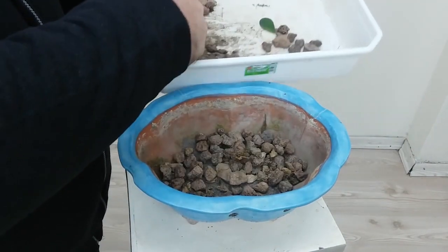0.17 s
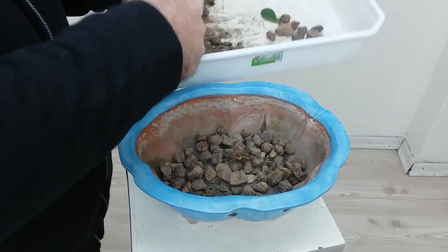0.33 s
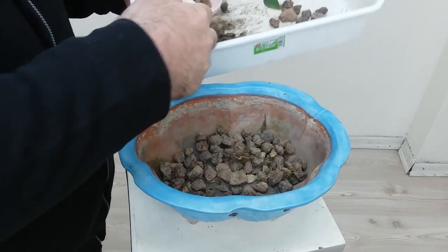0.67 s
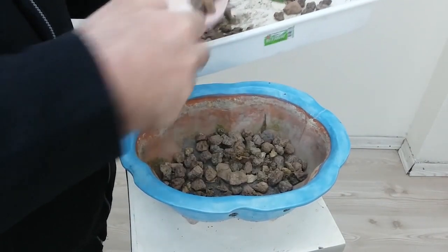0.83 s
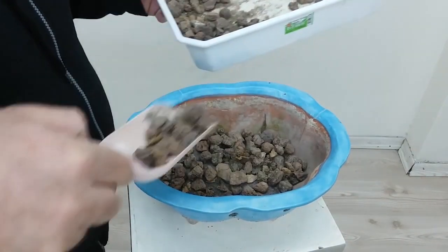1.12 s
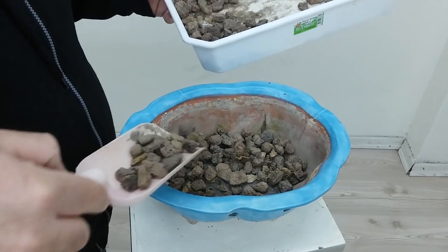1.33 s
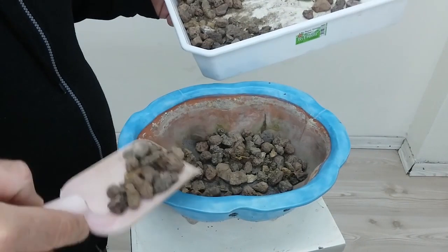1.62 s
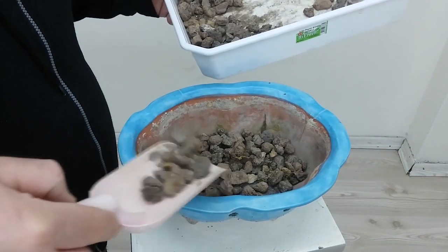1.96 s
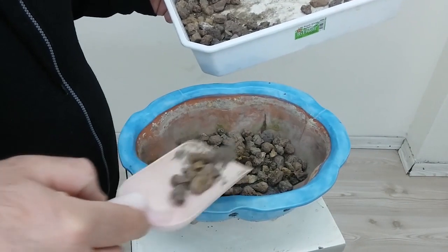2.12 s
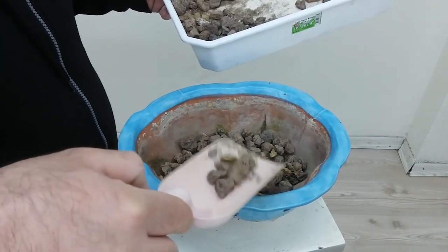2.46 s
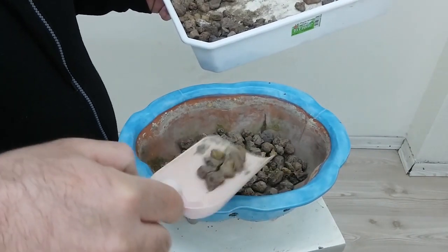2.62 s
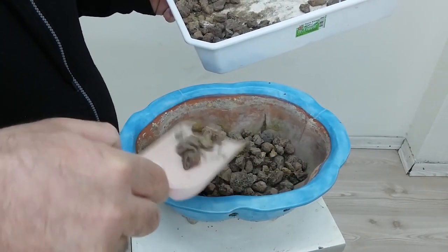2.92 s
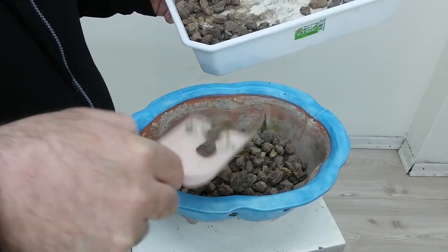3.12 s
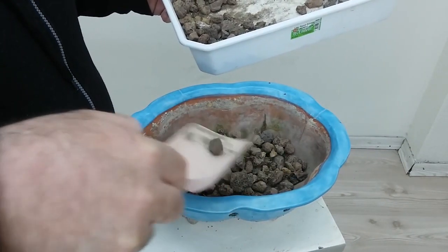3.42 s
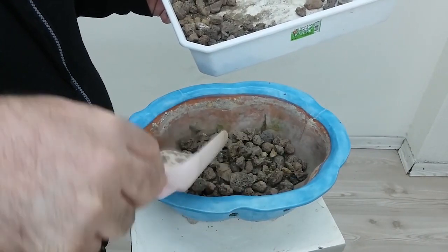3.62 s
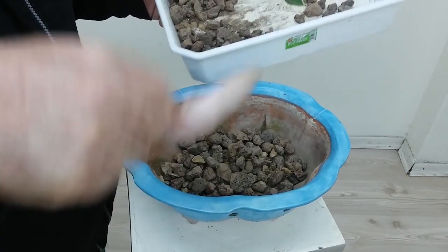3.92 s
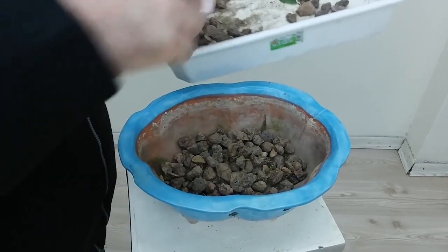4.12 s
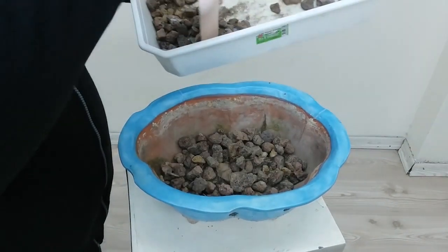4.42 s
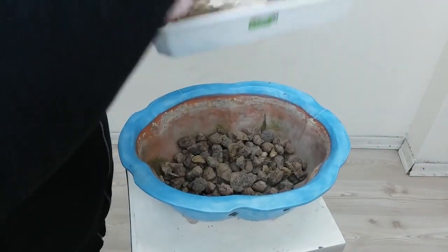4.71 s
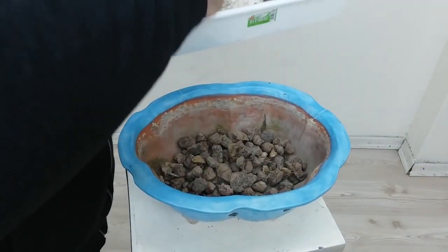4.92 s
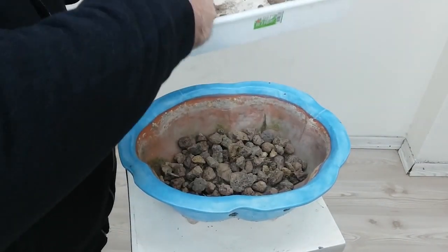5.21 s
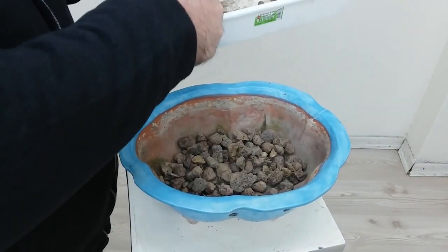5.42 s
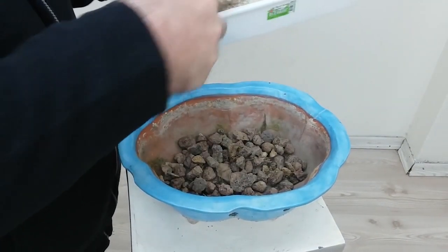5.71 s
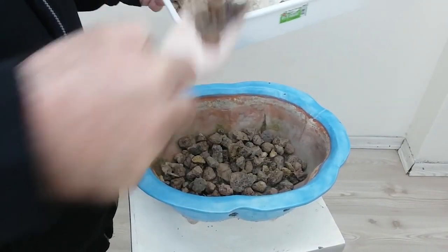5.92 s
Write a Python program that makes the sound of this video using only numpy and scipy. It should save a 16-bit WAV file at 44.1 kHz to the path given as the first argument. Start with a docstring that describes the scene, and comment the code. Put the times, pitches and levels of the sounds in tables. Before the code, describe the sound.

From the start a plastic scoop pushes through lumps of porous rock in a plastic tray, making a dense, gritty rattle with hollow knocks and a low boom, strongest just before 1 second. From about 1.3 seconds the lumps are shaken into a clay pot. They land unevenly on a bed of stones with dry clacks, a few clink against the clay wall, and fine grit trickles among them until about 3.8 seconds. A few faint taps on the tray follow at around 4 seconds. At 4.5 seconds the scoop digs in again with a sharp knock and a loud, crunchy rattle, which thins after 5.1 seconds into scattered knocks and light scraping up to about 6 seconds. Everything is heard from close by in a bare room, with slight reverberation and a faint hiss underneath.

```python
"""Scooping porous rock into a clay pot

A plastic scoop digs lumps out of a plastic tray and shakes them into a clay pot, in a bare room.
Each impact excites damped modes and a short crack of noise. Digging is a dense rattle of such
impacts in the booming tray, with knocks among them; in the pot each lump rings the bed of stones
or the clay wall. A close pair of microphones takes the sound, and its peaks are rounded."""
import sys
import numpy as np
from scipy import signal
from scipy.fft import rfft, irfft, next_fast_len
from scipy.io import wavfile

SR = 44100
rng = np.random.default_rng(int(sys.argv[2]) if len(sys.argv) > 2 else 0)


def pcm_store(signal):
    """Save signal as 16-bit PCM."""
    levels = np.round(np.clip(np.atleast_2d(signal), -1, 1) * 32767)
    wavfile.write(sys.argv[1], SR, levels.astype(np.int16).T)


N = 267731

# Levels are relative within each table; t60 is the time a vibration takes to fall by 60 dB.
# reverberation time: f/Hz, t60/s
REVERB_TIME = [(100, 1), (300, 0.73), (1000, 0.57), (3000, 0.58), (7000, 0.41), (14000, 1)]
# spectrum of the reflections: f/Hz, level/dB
REVERB_SPECTRUM = [(100, -23.5), (300, -7), (1000, -2), (3000, -3.5), (7000, -0.5), (14000, -31.5)]
# left-right coherence of the reflections: f/Hz, correlation
COHERENCE = [(100, 0.84), (300, 0.97), (600, 0.81), (1200, 0.13), (3000, 0.029), (6000, 0.049), (12000, 1)]
# left microphone relative to right: f/Hz, level/dB
MIC_BALANCE = [(60, 1.5), (180, 1.5), (550, -0.5), (1650, -2.5), (4970, 0.5), (15000, 2.5)]
# phase lead of the left microphone: f/Hz, phase/rad
MIC_PHASE = [(150, 0.), (700, 0.3), (3200, 0.97), (4000, 1.62), (5800, 0.5), (16000, 1.14)]

# modes of the tray's panels: f/Hz, level/dB, t60/s
TRAY_MODES = [(215, 2, 0.036), (297, -2.5, 0.034), (341.4, -1.5, 0.031), (409, -3, 0.098), (484, -4, 0.095),
              (564, -4.5, 0.07), (691, 8.5, 0.0091), (743, -0.5, 0.013), (952, 2, 0.0066),
              (1002, -7.5, 0.06), (1180, 7.5, 0.017), (1395, 5.5, 0.0081), (1770, 13.5, 0.0062),
              (1940, 0, 0.014), (2130, 13.5, 0.0027), (3160, 3, 0.01)]
# low modes of the tray's floor: f/Hz, level/dB, t60/s
BOOM_MODES = [(102.7, -14.5, 0.66), (159.4, -11, 0.4), (197.3, -11, 0.57), (221, -12, 0.18)]
# modes of the hollow scoop: f/Hz, level/dB, t60/s
SCOOP_MODES = [(791, -4.5, 0.13), (1120, -4, 0.048), (1354, 2, 0.054), (1680, 7, 0.018)]
# modes of the table under the pot: f/Hz, level/dB, t60/s
TABLE_MODES = [(61, -55.5, 0.079), (110, -52, 0.023), (263, -48, 0.012)]
# modes of the air in the pot: f/Hz, level/dB, t60/s
CAVITY_MODES = [(305, -34.5, 0.16), (438, -19.5, 0.11), (511.8, -18, 0.17), (686, -28.5, 0.06)]
# modes of the loose bed of stones: f/Hz, level/dB, t60/s
BED_MODES = [(777, -19, 0.085), (970, 12.5, 0.017), (1490, 12.5, 0.025), (1497, 4, 0.027),
             (1804, 10, 0.022), (2130, 19, 0.0051), (2400, 9, 0.012), (3490, 25, 0.002)]
# modes of the clay wall: f/Hz, level/dB, t60/s
WALL_MODES = [(1528, 7.5, 0.052), (2068, 0, 0.047), (2314, 0, 0.022), (3100, 0, 0.044), (3213, 4, 0.041),
              (3533, 2.5, 0.025), (3920, 3.5, 0.024), (4280, 5, 0.024), (4380, 7.5, 0.015),
              (4630, 10.5, 0.0083), (4900, 2, 0.0087), (5880, 6.5, 0.0043), (6900, 1.5, 0.019),
              (7300, -11, 0.025), (7900, -15, 0.03)]

# grit striking grit: t/s, level/dB, dust tail re level/dB
GRIT_TICKS = [(0.5444, -38, -26), (0.595, -33, -32), (0.6702, -29.5, -38), (0.8885, -23.5, -35),
              (0.9004, -39, -31), (1.512, -34, -22), (1.551, -22.5, -22), (1.6031, -28, -31),
              (1.6294, -26, -26), (1.893, -15.5, -30), (2.0556, -48, -28), (2.1705, -21, -28),
              (2.2817, -25, -29), (2.389, -46, -26), (2.4164, -37, -26), (2.4618, -48, -29),
              (2.563, -43, -26), (2.568, -38, -15), (2.7586, -53, -26), (2.8833, -44, -28),
              (2.9238, -47, -28), (3.0605, -37, -28), (3.128, -38, -21), (3.1822, -34, -26),
              (3.2016, -32, -28), (3.2835, -28.5, -21), (3.3774, -27, -32), (3.3847, -16, -35),
              (3.4466, -26, -35), (3.4999, -37, -29), (3.548, -21, -36.5), (3.8046, -29.5, -29),
              (3.8118, -37, -33), (4.5151, -40, -26), (4.5231, -23, -30), (4.7381, -30, -17),
              (5.2024, -34.5, -24), (5.838, -26, -26)]
# pushes of the scoop through the lumps: t/s, hold/s, level/dB
SCOOP_PUSHES = [(-0.03, 0.026, -14), (0.123, 0.027, -20), (0.15, 0.033, -13.5), (0.359, 0.093, -19.5),
                (0.497, 0.019, -15), (0.66, 0.048, -24.5), (0.79, 0.13, -33), (0.893, 0.068, -27.5),
                (4.326, 0.11, -38.5), (4.509, 0.013, -12), (4.694, 0.043, -11), (4.715, 0.186, -15),
                (4.937, 0.15, -16), (5.028, 0.053, -14), (5.21, 0.14, -28), (5.326, 0.077, -28),
                (5.434, 0.055, -24), (5.53, 0.033, -37)]
# how freely the tray's floor booms under rattle and knocks: t/s, level/dB
BOOM_RESPONSE = [(0, -3.5), (0.3, -5.5), (0.4, -47), (0.75, -10.5), (0.88, 1.5), (0.93, -5), (1.1, -10),
                 (1.3, -25.5), (4.0, -28.5), (4.55, -17.5), (4.85, -11), (5.1, -28), (5.6, -57), (5.9, -60)]
# the scoop's bowl grazing lumps and tray: t/s, level/dB, f/Hz
SCOOP_GRAZES = [(.053, -14.5, 1700), (0.18, -16, 1700), (.21, -24.5, 1660), (4.073, -35, 1307),
                (4.334, -28, 814), (4.356, -34.5, 805), (4.501, -15, 1150), (4.528, -4, 1100),
                (5.085, -14, 1700), (5.107, -20, 1720)]
# scoop and lumps knocking on the tray: t/s, level/dB, f/Hz, crack re level/dB
TRAY_KNOCKS = [(0.009, -3.5, 418, -19), (0.052, -9, 1010, -34), (0.195, -8, 607, -17),
               (0.215, -16, 585, -24), (0.39, -14, 1710, -38), (0.479, -5, 1230, -17),
               (0.512, -6.5, 1930, -12.5), (0.535, -29, 1590, -21), (0.544, 4, 836, -25),
               (0.569, -2.5, 623, -39), (0.595, -4.5, 595, -10.5), (0.672, 6, 920, -19.5),
               (0.691, -3.5, 1190, -41), (0.737, -5.5, 587, -41), (0.872, -5.5, 404, -44),
               (0.889, 10, 283, -19.5), (0.897, -5, 740, -16.5), (0.905, -2.5, 770, -31),
               (0.923, 2.5, 358, -45), (0.95, 3.5, 220, -45), (0.988, -1, 277, -45), (1.163, -7, 620, -29),
               (1.242, -10.5, 518, -32), (1.255, -29, 677, -19), (4.065, -21, 339, -18),
               (4.071, -21.5, 390, -41), (4.101, -28.5, 440, -33), (4.309, -30.5, 1700, -34),
               (4.334, -30.5, 820, -6), (4.36, -23, 810, -35), (4.416, -24, 780, -17),
               (4.451, -24, 493, -17), (4.502, -26, 1140, -4.5), (4.516, -26, 990, 3),
               (4.526, 3.5, 960, -9), (4.54, -1.5, 368, -30), (4.55, -0.5, 604, -28),
               (4.557, -29, 750, -31), (4.704, -23, 1570, -33), (4.736, -2, 1150, -10),
               (4.741, -1, 1550, -8), (4.758, 1, 480, -11), (4.798, 3.5, 590, -15), (4.835, 1, 556, -28),
               (4.869, 2, 590, -26), (4.9, -16, 1950, -28.5), (4.91, 0, 436, -16.5), (5.089, -7, 420, -10),
               (5.207, -19, 1520, -0.5), (5.246, -7.5, 1190, -18.5), (5.378, -13, 720, -30),
               (5.436, -11, 1520, -16), (5.444, -1, 630, -29), (5.451, -5, 685, -37), (5.464, -8, 700, -39),
               (5.489, -5.5, 1030, -14), (5.58, -4.5, 940, -18.5), (5.625, -9, 960, -16.5),
               (5.836, -6.5, 420, -40), (5.843, -0.5, 540, -19.5), (5.9, -11.5, 530, -21),
               (6.031, -10.5, 430, -30)]
# small stones sliding off the scoop and settling: t/s, level/dB
TRICKLE_LEVEL = [(1.2, -91), (1.3, -34), (1.57, -19), (2.07, -32), (2.3, -40), (2.86, -34), (3.22, -27.5),
                 (3.3, -32), (3.44, -22.5), (3.75, -110)]
# lumps landing on the bed: t/s, level/dB, f/Hz, crack re level/dB
BED_IMPACTS = [(1.324, -27, 2000, -27), (1.355, -16.5, 1608, -18), (1.399, -17.5, 1790, -10),
               (1.468, -20, 1744, -31), (1.485, -20, 1540, -16), (1.517, -16, 1870, -17),
               (1.68, -16, 1980, -39), (1.74, -21.5, 1510, -45.5), (1.787, -18.5, 1940, -15),
               (1.799, -16, 1850, -17), (1.885, -26, 1610, -12), (1.916, -12, 1710, -37),
               (1.931, -9, 1730, -34), (1.947, -11, 960, -14), (1.955, -19, 1940, -11),
               (1.985, -24, 1820, -30), (2.056, -14, 1570, -8), (2.068, -23.5, 1510, -13),
               (2.084, -18, 1390, -13), (2.1, -13, 697, -32), (2.171, -22, 1610, 2.5),
               (2.186, -18, 1340, -20), (2.218, -17.5, 1430, -21), (2.237, -18.5, 1590, -26),
               (2.282, -25.5, 1470, -0.5), (2.303, -23, 1610, -11), (2.358, -22.5, 1080, -24),
               (2.391, -15.5, 1900, -12.5), (2.419, -12, 2100, -11.5), (2.464, -17.5, 1390, -13),
               (2.473, -20, 1800, -5), (2.563, -22, 1980, -25), (2.605, -16, 1770, -23),
               (2.744, -23, 2330, -27.5), (2.759, -26, 920, -10), (2.825, -28, 1770, -35),
               (2.831, -16, 1790, -16), (2.869, -20.5, 1470, -17), (2.884, -25, 1960, -6),
               (2.904, -21.5, 2130, -17), (2.924, -18, 1530, -12.5), (2.974, -27, 2500, -15.5),
               (3.014, -28, 1520, -19), (3.016, -18, 2010, -30), (3.041, -10, 1490, -19),
               (3.059, -10.5, 1440, -8.5), (3.111, -22, 1620, -22), (3.176, -20.5, 1530, -31),
               (3.181, -8.5, 1960, -20), (3.195, -8, 1460, -11), (3.202, -21.5, 1790, -5.5),
               (3.248, -31, 1820, -10), (3.319, -12, 940, -22), (3.349, -17, 1460, -13.5),
               (3.5, -12, 1800, -17), (3.512, -27, 970, -2), (3.52, -22.5, 1190, -14),
               (3.552, -49, 1210, 11), (3.605, -16.5, 840, -22), (3.612, -19, 967, -14.5),
               (3.639, -17.5, 1660, -22), (3.805, -39.5, 2305, 17.5), (3.813, -46, 2320, 7)]
# lumps striking the wall: t/s, level/dB, f/Hz, crack re level/dB, fall away from f/(dB per octave),
# contact/s, lingering f/Hz, lingering ring re level/dB
WALL_IMPACTS = [(1.528, -11.5, 4440, -26, 12, 0.0043, 2083, -11),
                (1.553, -14, 3880, -9, 16, .006, 3950, -12), (1.604, -5, 3450, -15.5, 9, .005, 2083, -6.5),
                (1.894, -6.5, 3830, -5, 22, .006, 3548, -6.5),
                (2.425, -15, 3160, -25, 14, 0.0016, 2270, -5.5), (2.569, -8, 4320, -6, 3, .007, 4280, -10),
                (3.127, -11, 1700, -9, 11.5, 0.0051, 1500, -17),
                (3.286, -4, 3220, -3.5, 15, 0.0077, 3548, -5.5),
                (3.386, -11.5, 2260, -12, 9, .003, 2270, -2.5),
                (3.447, -13.5, 3150, -26, 21, 0.0053, 3540, -22)]

GRIT_SLOPE = 1.126   # dB of grit and sand per dB of rattle
TRAY_CUTOFF_HZ, BED_CUTOFF_HZ = 5560, 6000   # blunt contacts excite little above these


def amp(db):
    """Amplitude ratio of a level in decibels."""
    return 10 ** (np.asarray(db) / 20)


def at_hz(points, hz):
    """Interpolation on a logarithmic frequency axis."""
    return np.interp(np.log(hz), np.log(np.array(points)[:, 0]), np.array(points)[:, 1])


def in_time(rows):
    """Linear interpolation at every sample."""
    return np.interp(np.arange(N) / SR, *np.transpose(rows))


def band(x, low_hz, high_hz):
    """Band-pass filter, 12 dB per octave on each side."""
    return signal.sosfilt(signal.butter(2, [low_hz, high_hz], "band", fs=SR, output="sos"), x)


def high_pass(x, hz):
    """Fourth-order high-pass filter."""
    return signal.sosfilt(signal.butter(4, hz, "high", fs=SR, output="sos"), x)


def low_pass(x, hz):
    """Fourth-order low-pass filter."""
    return signal.sosfilt(signal.butter(4, hz, "low", fs=SR, output="sos"), x)


def unit_power(x):
    """Normalisation to a mean square of one."""
    return x / np.sqrt(np.mean(x ** 2) + 1e-20)


def impulses(s, sizes):
    """Brief contacts idealised as impulses at times s."""
    clicks = np.zeros(N)
    np.add.at(clicks, np.round(s * SR).astype(int), sizes)
    return clicks


def grains(per_s, uneven_db):
    """Shot noise: independent contacts of random size and sign."""
    sizes = amp(uneven_db * np.minimum(rng.exponential(1, N), 4)) * rng.choice([-1, 1], N)
    return sizes * (rng.random(N) < per_s / SR)


def ring(clicks, hz, t60):
    """Damped oscillator: each impulse starts an exponentially decaying sine."""
    r, w = amp(-60 / (max(t60, .003) * SR)), 2 * np.pi * hz / SR
    return signal.lfilter([0, np.sin(w)], [1, -2 * r * np.cos(w), r * r], clicks + 1e-18)


def rattle(modes, per_s, uneven_db):
    """Random excitation: each contact drives every mode with a random weight; unit power."""
    contacts = grains(per_s, uneven_db)
    rings = (amp(db) * ring(contacts * rng.normal(0, 1, N), hz, t60) for hz, db, t60 in modes)
    return unit_power(sum(rings))


def strike(s, gains, modes):
    """Modal superposition; gains has a row for each blow and a column for each mode."""
    return sum(ring(impulses(s, gain * amp(db)), hz, t60) for (hz, db, t60), gain in zip(modes, gains.T))


def thud(s, level_db, modes):
    """Impulse response of low modes, each varying by about 3 dB from blow to blow."""
    return strike(s, amp(level_db[:, None] + rng.normal(0, 3, (len(s), len(modes)))), modes)


def strike_near(s, level_db, hz, modes, fall_db=90):
    """The point of impact favours modes near hz; the default fall per octave singles out the nearest."""
    octaves = np.abs(np.log2(np.array(modes)[:, 0] / hz[:, None]))
    weights = amp(-fall_db * np.minimum(octaves, 1.6) + rng.normal(0, 2.5, octaves.shape))
    weights *= rng.choice([-1, 1], octaves.shape)
    weights /= np.sqrt(np.sum(weights ** 2, axis=1, keepdims=True))
    return strike(s, weights * amp(level_db)[:, None], modes)


def clacks(s, level_db, pitch_hz, cycles, spread_octaves):
    """Free vibration of irregular lumps: inharmonic modes, each falling 60 dB in the given cycles."""
    count, length, rise_s = 11, 3000, 0.000089
    out, t = np.zeros(N + length), np.arange(length) / SR
    chance = rng.uniform(-1, 1, (len(s), 2, count))
    steps = np.linspace(-1, 1, count)
    scatter = steps + chance[:, 0] / count * (steps != 0)
    hz = np.clip(pitch_hz[:, None] * 2 ** (spread_octaves * scatter), 200, 9000)[..., None]
    strength = (amp(-9 * np.sqrt(np.abs(scatter))) * np.sign(chance[:, 1]))[..., None]
    shapes = np.sum(strength * np.sin(2 * np.pi * hz * t) * amp(-60 * t * hz / cycles), axis=1)
    shapes *= 1 - np.exp(-t / rise_s)   # a rough contact takes time to build up
    for start, db, shape in zip(np.round(s * SR).astype(int), level_db, shapes):
        out[start:start + length] += amp(db) * shape / np.abs(shape).max()
    return out[:N]


def crack(s, level_db, low_hz, high_hz, decay_s, rise_s=0.0011):
    """Contact transient: a single snap, then a burst of noise that decays exponentially."""
    decay = signal.lfilter([1], [1, -np.exp(-1 / (decay_s * SR))], impulses(s, amp(level_db)) + 1e-18)
    pole = np.exp(-1 / (rise_s * SR))
    envelope = signal.lfilter([1 - pole], [1, -pole], decay)
    snap = impulses(s, amp(level_db + 3))
    return band(envelope * rng.standard_normal(N) + snap, low_hz, high_hz)


def hiss():
    """Noise floor: faint band-limited noise, uncorrelated between left and right."""
    return amp(-58) * high_pass(band(rng.standard_normal((2, N)), 970, 6400), 500)


def room(x):
    """Reverberation: convolution with half-octave bands of noise, each decaying at its own rate."""
    t, response = np.arange(int(.9 * SR)) / SR, 0
    edges = 70 * 2 ** np.arange(0, 8.1, .5)
    for low, high in zip(edges, edges[1:]):
        hz = np.sqrt(low * high)
        mid, side = band(rng.standard_normal((2, len(t))), low, high)
        coherence = at_hz(COHERENCE, hz)
        pair = np.sqrt(1 + coherence) * mid + np.sqrt(1 - coherence) * side * [[1], [-1]]
        response = response + pair * amp(at_hz(REVERB_SPECTRUM, hz) - 60 * t / at_hz(REVERB_TIME, hz))
    early_boost = 1 + amp(6 - 60 * t / 0.03)
    onset = np.clip((t - .002) / 0.0029, 0, 1)   # reflections thicken after the first wall
    return signal.fftconvolve(x[None], response * early_boost * onset, axes=1)[:, :N]


def sand():
    """Dense shot noise: tiny grains merge into a bright, rough hiss; unit power."""
    return unit_power(band(grains(per_s=3000, uneven_db=4.5), 5000, 13000))


def grit_ticks():
    """Short contacts have bright spectra: grit ticks on grit and throws a tail of dust."""
    s, level_db, tail_db = np.transpose(GRIT_TICKS)
    tick = crack(s, level_db + 7, 4000, 10000, decay_s=0.00076)
    dust = crack(s, level_db + tail_db + 12.5, 5300, 13000, decay_s=0.029)
    return tick + dust


def push_level(attack_s=0.018, release_db_per_s=117.5):
    """Envelope in dB: each push rises, holds and decays exponentially; the strongest prevails."""
    start, hold, db = np.transpose(SCOOP_PUSHES)[..., None]
    t = np.arange(N) / SR - start - attack_s
    rise_db = 20 * np.log10(np.clip(1 + t / attack_s, 1e-6, 1))
    return np.max(db + rise_db - release_db_per_s * np.maximum(t - hold, 0), axis=0)


def tray():
    """Forced vibration: pushes and knocks drive the tray's panels and floor; grazes ring the scoop."""
    push_db = push_level()
    body = amp(push_db - 6.5) * rattle(TRAY_MODES, per_s=600, uneven_db=4)
    grit = unit_power(band(band(grains(per_s=2100, uneven_db=3.5), 2240, 3880), 1600, 9600))
    grit *= amp(GRIT_SLOPE * (push_db + 24) - 40.5)
    rumble = unit_power(band(grains(per_s=180, uneven_db=-7), 76, 330))
    rumble *= amp(push_db + in_time(BOOM_RESPONSE) - 15)
    s, knock_db, hz, crack_db = np.transpose(TRAY_KNOCKS)
    panels = strike_near(s, knock_db - 9.5, hz, TRAY_MODES, fall_db=7)
    lumps = clacks(s, knock_db - 9, hz, cycles=12.3, spread_octaves=1.43)
    scoop = strike_near(*np.transpose(SCOOP_GRAZES), SCOOP_MODES)
    cracks = crack(s, knock_db + crack_db + 15, 1500, 4670, decay_s=0.0012)
    contacts = low_pass(high_pass(body + panels + lumps + scoop, 280) + cracks, TRAY_CUTOFF_HZ)
    fine_sand = amp(GRIT_SLOPE * (push_db + 17.5) - 54) * sand()
    boom_db = np.interp(s, *np.transpose(BOOM_RESPONSE))
    boom = thud(s, knock_db + boom_db - 18, BOOM_MODES)
    return contacts + grit + fine_sand + rumble + boom


def trickle():
    """Random excitation of the bed by small sliding stones, with grit among them."""
    grit = amp(-7.5) * unit_power(band(band(grains(per_s=460, uneven_db=0), 2200, 4400), 2000, 6000))
    return amp(in_time(TRICKLE_LEVEL) - 17.5) * (rattle(BED_MODES, per_s=79, uneven_db=-2.5) + grit)


def pot_thump(s, level_db, pour_start_s=1.3, fade_db_per_s=10):
    """Resonance of the table and of the pot's air; the air answers less as the pouring goes on."""
    on_wall = np.isin(s, np.transpose(WALL_IMPACTS)[0])
    level_db = np.where(on_wall, level_db - 1, level_db)   # a glancing blow moves air and table less
    cavity_db = level_db - 1.5 - fade_db_per_s * (s - pour_start_s)
    return thud(s, level_db, TABLE_MODES) + high_pass(thud(s, cavity_db, CAVITY_MODES), 308)


def stone_bed(bounce_s=0.0065, bounce_db=-5):
    """Inelastic impact: a lump rings itself and the bed, rocks, and touches again more weakly."""
    s, level_db, hz, _ = np.transpose(BED_IMPACTS)
    again = s + bounce_s * rng.uniform(0.496, 1.5, len(s))
    s, level_db, hz = np.r_[s, again], np.r_[level_db, level_db + bounce_db], np.r_[hz, hz]
    lumps = clacks(s, level_db - 6.5, hz, cycles=19, spread_octaves=1)
    return lumps + strike_near(s, level_db - 14, hz, BED_MODES, fall_db=7)


def clay_wall(touches=6):
    """Multiple contact: a rough lump touches the wall several times in one blow; one ring lingers."""
    s, level_db, hz, _, fall_db, contact_s = np.repeat(WALL_IMPACTS, touches, axis=0).T[:6]
    fraction = np.tile(np.linspace(0, 1, touches), len(WALL_IMPACTS)) * rng.uniform(.8, 1, len(s))
    clinks = strike_near(s + fraction * contact_s, level_db - 13.5, hz, WALL_MODES, fall_db[:, None])
    s, level_db, *_, linger_hz, linger_db = np.transpose(WALL_IMPACTS)
    return clinks + strike_near(s, level_db + linger_db, linger_hz, WALL_MODES)


def pot():
    """Superposition of landings and trickle; also the latest lump's left-right difference in dB."""
    s, level_db, _, crack_db = np.transpose(sorted(BED_IMPACTS + [hit[:4] for hit in WALL_IMPACTS]))
    cracks = crack(s, level_db + crack_db + 11, 2150, 6540, decay_s=0.001)
    thump = pot_thump(s, level_db)
    pan_db = rng.normal(0, 3, len(s))   # lumps land a little left or right
    latest = np.clip(np.searchsorted(s, np.arange(N) / SR, side="right") - 1, 0, None)
    bed, wall = stone_bed(), clay_wall()
    stones = low_pass(bed + trickle(), BED_CUTOFF_HZ)
    dust = amp(in_time(TRICKLE_LEVEL) - 37.5) * sand()
    return high_pass(cracks + wall + stones, 670) + dust + thump, pan_db[latest]


def scene():
    """Direct and reverberant fields of tray, pot and grit add over a faint hiss."""
    digging = tray()
    landing, pan_db = pot()
    ticks = grit_ticks()
    direct = ticks + digging * amp([[-.6], [.6]]) + landing * amp(pan_db * [[.5], [-.5]])
    return hiss() + direct + room(amp(-31) * digging + amp(-32) * landing + amp(-38) * ticks)


def record(dry):
    """Two microphones differ in gain and phase; saturation rounds the peaks, and the band is limited."""
    size = next_fast_len(N)
    hz, sides = np.fft.rfftfreq(size, 1 / SR) + 1, np.array([[.5], [-.5]])
    pair = amp(at_hz(MIC_BALANCE, hz) * sides) * np.exp(1j * at_hz(MIC_PHASE, hz) * sides)
    roll_off = 1 / np.sqrt(1 + (hz / 14500) ** 6)
    coloured = high_pass(irfft(rfft(dry, size) * pair * roll_off, size)[:, :N], 53)
    rounded = 1.2 * np.tanh(coloured / 1.2)
    return signal.sosfilt(signal.cheby2(14, 70, 16600, fs=SR, output="sos"), rounded)


dry = scene()
out = record(dry)
pcm_store(out)
```